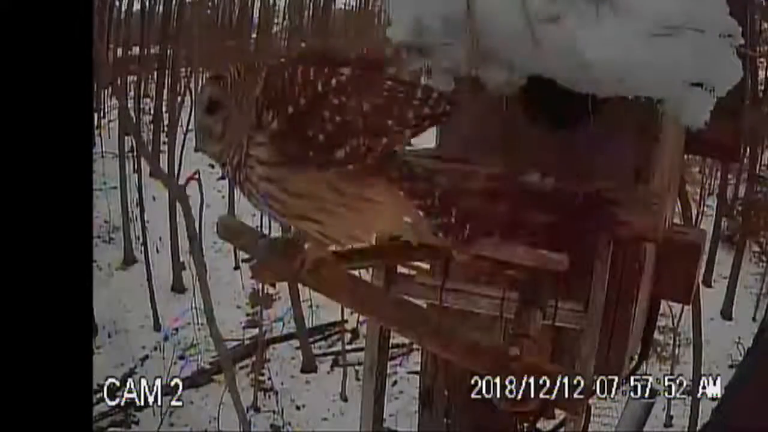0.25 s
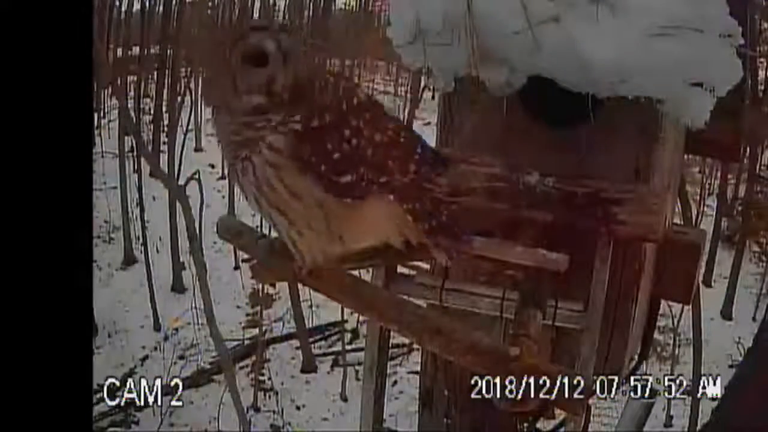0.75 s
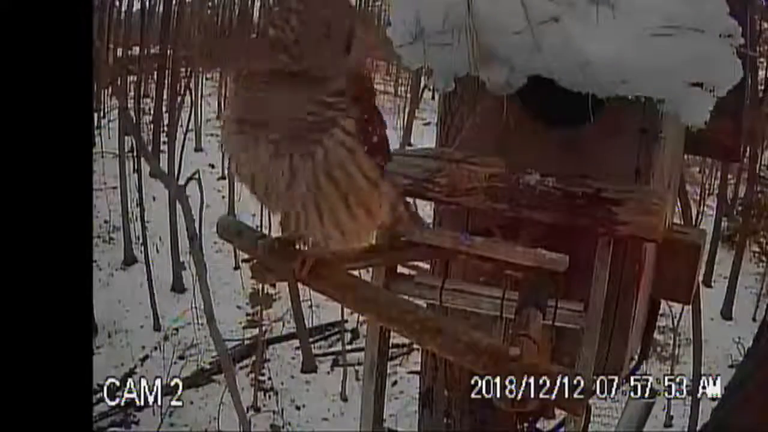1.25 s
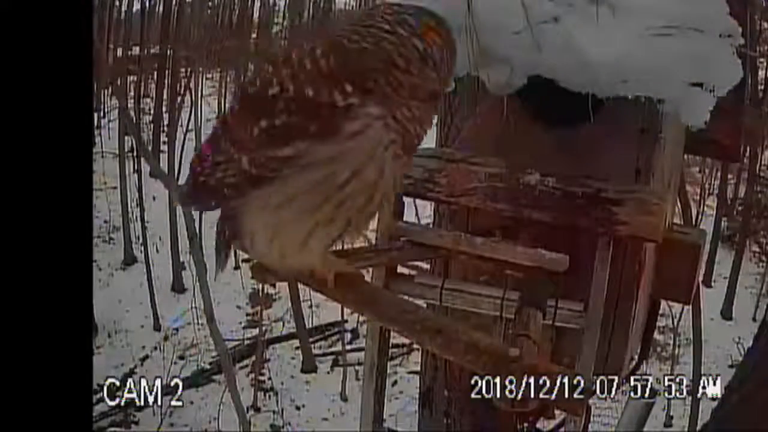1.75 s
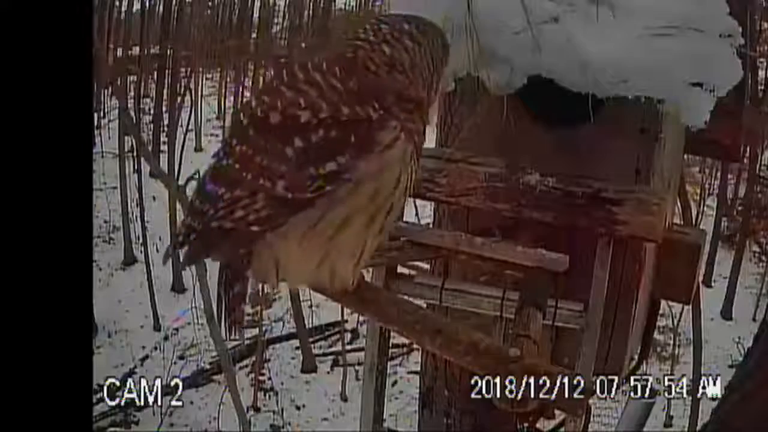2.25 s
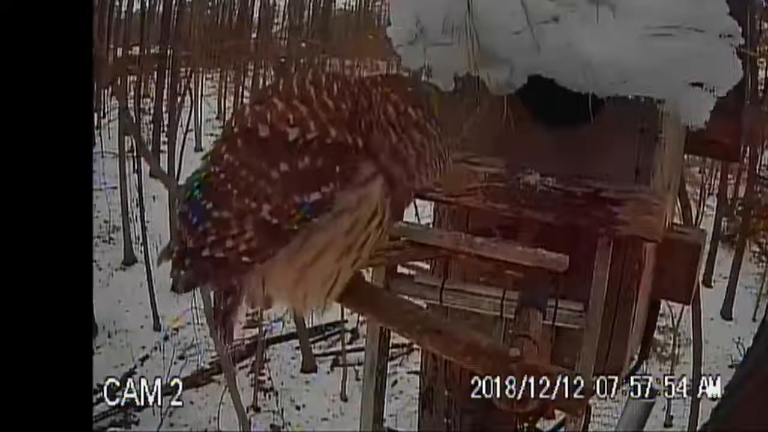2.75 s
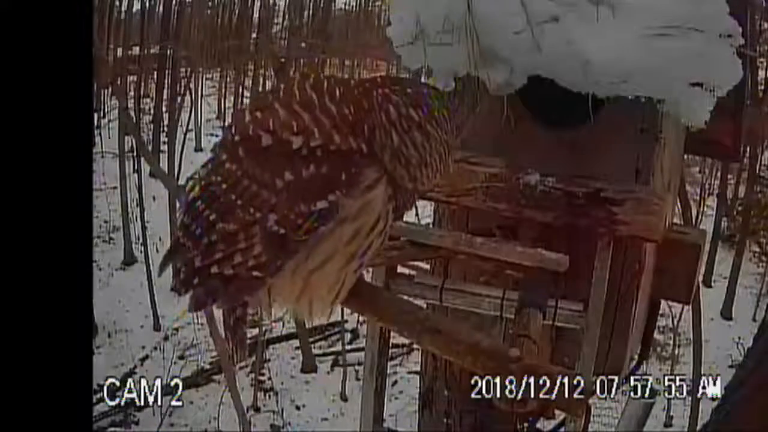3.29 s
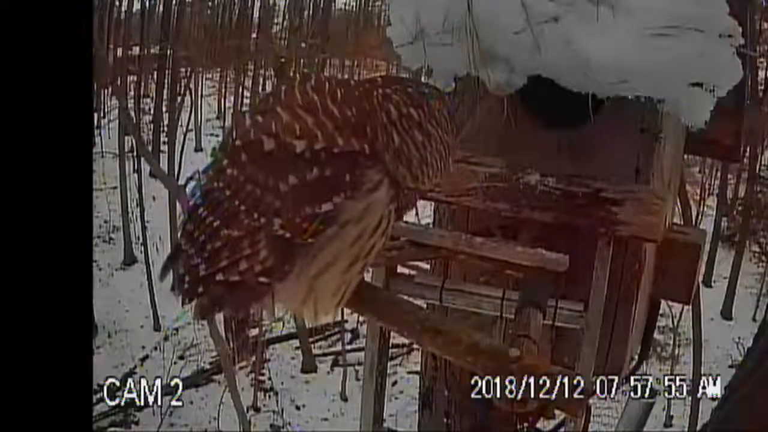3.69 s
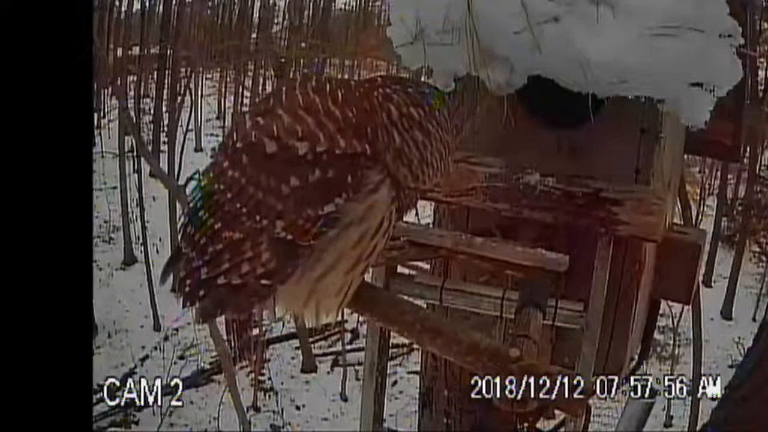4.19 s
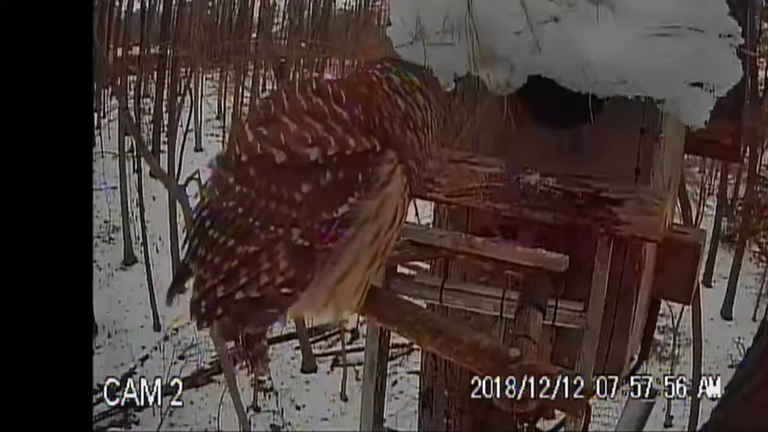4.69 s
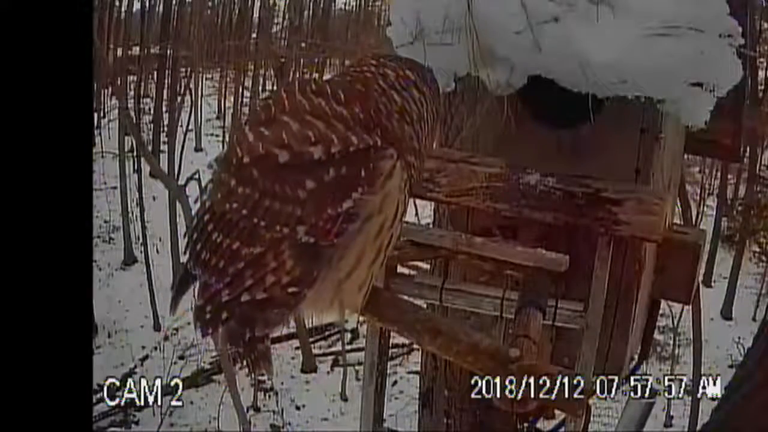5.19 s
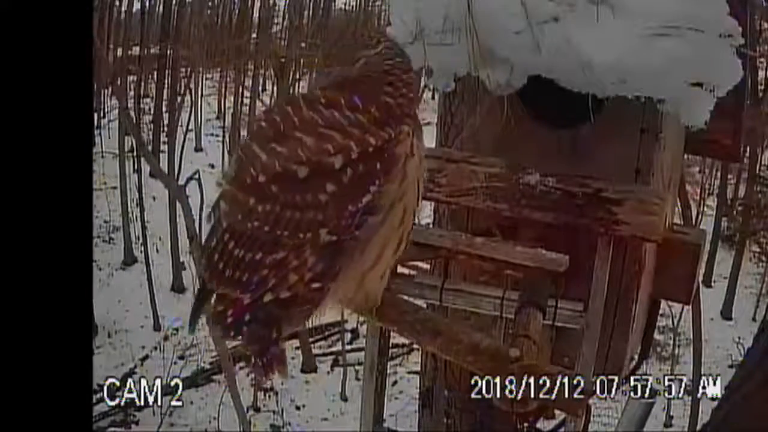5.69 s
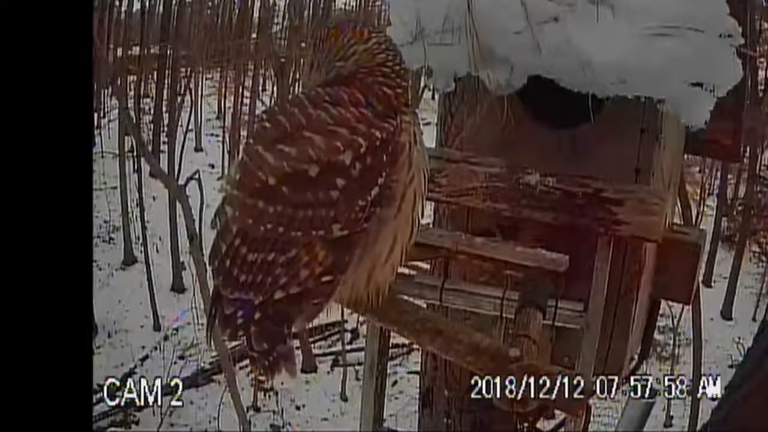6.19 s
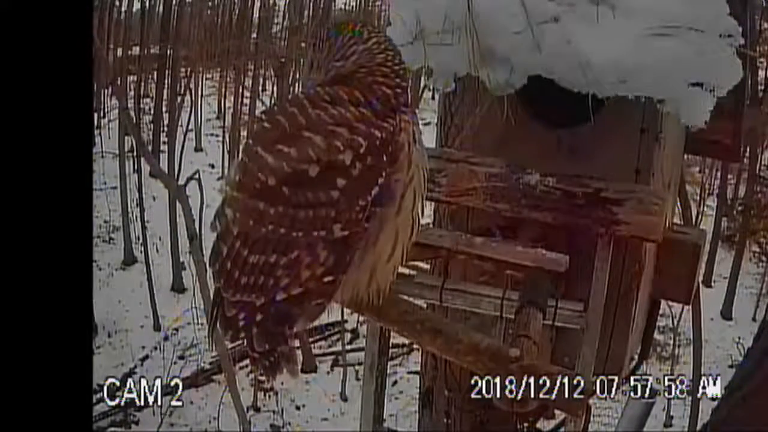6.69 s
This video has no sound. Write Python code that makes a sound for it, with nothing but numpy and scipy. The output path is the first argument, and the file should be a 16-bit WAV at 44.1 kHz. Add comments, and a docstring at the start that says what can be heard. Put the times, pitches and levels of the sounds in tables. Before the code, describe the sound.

Crows caw repeatedly in echoing woods over distant droning traffic, after an owl's claws briefly clatter on a wooden perch.

```python
"""Crows in a winter wood

Crows caw from bare trees: throat resonances shape a hoarse harmonic tone, and a strong echo and the
reverberation of the wood follow each call. An owl's claws excite the modes of a nearby wooden perch.
Far engines drone under it all, in a wash of traffic noise. The narrow-band microphone line feeds the
left channel and leaks faintly into the right."""
import sys
import numpy as np
from scipy import signal
from scipy.fft import rfft, irfft
from scipy.io import wavfile
from scipy.ndimage import uniform_filter1d

SR = 44100
rng = np.random.default_rng(int(sys.argv[2]) if len(sys.argv) > 2 else 0)


def master(y):
    """Save y as 16-bit WAV."""
    cut = np.clip(np.atleast_2d(y).T, -1, 1)
    pcm = np.round(cut * 32767)  # scale
    wavfile.write(sys.argv[1], SR, pcm.astype(np.int16))


N = 306054

# Spectrum of far traffic and the wood's steady sound: f/Hz, relative density/dB
AMBIENT_SPECTRUM = [(15, -56.5), (25, -23), (108, -4), (193, -6.5), (248, -4.5), (346, -13.5), (703, -12.5),
                    (1140, -18), (1550, -10.5), (1720, -22.5), (2360, -31.5), (2560, -35.5), (3150, -36),
                    (3650, -39.5), (4740, -80), (8030, -120)]


def caw(level_db, top_hz, length):
    """Source and filter: a rough harmonic tone on an arched pitch passes the throat's resonances."""
    # Throat response: f/Hz, gain/dB
    formants = [(400, -28), (800, -18), (1050, -19.5), (1300, 0.8), (1620, -1), (1850, -4.5), (2100, -18),
                (2400, -20.5), (2800, -34), (3200, -28.5), (3700, -36.5), (5000, -76)]
    # Arch of a call: end of rise, start of sag (shares of the length);
    # pitch lost at start, at end (shares); effort at start/dB, at end/dB
    short_arch = (.4, .5, .4, .22, -10, -8)
    drawn_arch = (.3, .35, .14, .22, -8, -3)
    # Relative depth of rasp on harmonics 1 to 5; the second is the cleanest
    rasp_depth = [2.5, .3, 2.2, 6, 12]
    risen, sags, start_loss, end_loss, start_db, end_db = short_arch if length < .16 else drawn_arch
    roughness = .2 if length < .16 else .5
    count = round(length * SR)
    share = np.linspace(0, 1, count)
    rise = np.cos(np.pi / 2 * np.minimum(share / risen, 1)) ** 2
    fall = (np.maximum(share - sags, 0) / (1 - sags)) ** 2
    jitter = 1 + .04 * roughness * drift(count, 60)
    turns = np.cumsum(top_hz * (1 - start_loss * rise - end_loss * fall) * jitter) / SR
    rasp = [(.4 + np.exp(-share / .1)) * drift(count, 400) for _ in rasp_depth]  # roughest at the onset
    voice = sum(np.cos(2 * np.pi * (k * turns + rng.random())) * (1 + roughness * depth * rasp[k - 1])
                for k, depth in enumerate(rasp_depth, 1))
    throb_turns = np.cumsum(70 * (1 + .3 * drift(count, 30))) / SR  # the throat throbs near 70 Hz
    voice *= 1 + .12 * np.cos(2 * np.pi * (throb_turns + rng.random()))
    effort = gain_of(start_db * rise + end_db * fall)
    voice = np.pad(effort * voice * signal.windows.tukey(count, .08), 300)
    hz = np.fft.rfftfreq(len(voice), 1 / SR)
    # Nearer, louder caws are brighter, and so are drawn-out ones.
    tilt_db_per_octave = .5954 * (level_db + 28.5) + 5.5 * (length > .16)
    colour_db = spectrum_at(formants, hz) + tilt_db_per_octave * np.log2((hz + 1) / 1500)
    return gain_of(level_db) * irfft(rfft(voice) * gain_of(colour_db), len(voice))[300:]


def crows():
    """Multipath propagation: each caw arrives direct, as clear echoes, and scattered around its tree."""
    # Calls: t/s, level/dB, top pitch f/Hz, length/s, echo gain/dB
    calls = [(0.076, -31, 766, .1, -5.5), (0.164, -28, 810.5, 0.16, -5.5), (0.423, -26.5, 757.6, .12, -6.5),
             (0.55, -26, 825, 0.12, -6), (0.786, -29.5, 719, 0.1, -6), (.885, -27.5, 809, .12, -5.5),
             (1.177, -30.5, 820.7, .11, -2.5), (1.228, -28, 821, .11, -19), (1.311, -37.5, 658, 0.28, -6.5),
             (1.799, -37, 815, 0.1, -2.5), (1.845, -28, 822.5, .11, -5), (2.144, -36, 814.3, 0.12, -5),
             (2.282, -30.5, 811.5, .1, -2.2), (2.4, -37, 626.4, .23, -8), (2.587, -31.5, 803, 0.096, -8.5),
             (2.982, -31.5, 793, 0.13, -5.5), (3.048, -29.5, 804, 0.097, -2.5),
             (3.444, -28.5, 802.5, .11, -3), (3.779, -29, 798.6, 0.11, -6),
             (4.075, -29.5, 804.7, .11, -5.5), (4.39, -31, 796, .1, -3), (4.749, -31, 796.3, .1, -2.8),
             (5.123, -30.5, 797.7, .11, -3.2), (5.489, -31, 790, 0.12, -4.5), (5.991, -31.5, 792, .11, -2),
             (6.259, -30, 796.4, .11, -4), (6.359, -37.5, 631.4, 0.26, -7), (6.424, -32.5, 732, 0.099, -4),
             (6.726, -37.5, 644, 0.23, -15), (6.732, -37.5, 739, .11, -1.1), (6.812, -29.5, 798, .115, -3)]
    # Reflections off a wall and nearby trunks: delay/s, level/dB added to the call's echo gain
    reflections = [(0.043, 4.5), (0.09, -3), (.13, -18)]
    early, trees = np.zeros(N), np.zeros((3, N))
    for start, level_db, top_hz, length, echo_db in calls:
        call = caw(level_db, top_hz, length)
        bird = 0 if length > .16 else 1 if top_hz > 775 else 2  # birds differ in length and pitch
        add(early, start, call)
        add(trees[bird], start, gain_of(echo_db / 2) * call)
        for delay, db in reflections:
            add(early, start + delay, gain_of(echo_db + db) * call)
    return early + gain_of(-3) * sum(wood_reverberation(tree) for tree in trees)


def wood_reverberation(sound):
    """Scattering: trunks return sparse reflections of random sign; each band decays exponentially."""
    # Reverberation time: f/Hz, T60/s
    decay_times = [(700, 0.95), (1500, 0.67), (2500, 0.67), (3500, 0.2)]
    taps = np.zeros(SR)
    slots = np.arange(500, SR - 20, 20)
    taps[slots + rng.integers(0, 20, len(slots))] = rng.choice([-1., 1.], len(slots))
    hz, t, bands = signal.stft(taps, SR, nperseg=256)
    decay = gain_of(-60 * t / spectrum_at(decay_times, hz)[:, None])
    tail = signal.istft(bands * decay, SR, nperseg=256)[1]
    return signal.fftconvolve(sound, tail / np.linalg.norm(tail))[:N]


def owl_claws():
    """Modal excitation: a tap and a dying stick-slip scrape ring the perch modes near the blow's centre."""
    # Blows: t/s, peak level/dB, spectral centre f/Hz, scrape time/s
    blows = [(0.131, -26, 660, 0.015), (0.155, -25, 900, 0.012), (0.2, -22.5, 830, 0.02),
             (0.283, -26, 2700, 0.0025), (0.286, -24, 830, 0.0035), (0.324, -28.5, 2980, 0.025),
             (0.425, -15, 1610, 0.016), (0.447, -26.5, 2290, 0.025), (0.482, -28, 2940, 0.021),
             (1.792, -44, 2800, 0.011), (2.704, -30, 1199, .004)]
    # Modes of the perch: f/Hz, relative level/dB, T60/s
    modes = [(474, -11.5, .03), (754, -8, 0.077), (1194, -5.5, 0.059), (2003, -2.5, 0.04),
             (2134, 3, 0.0083), (2650, -6.5, 0.014), (3130, -14.5, 0.019)]
    out, t = np.zeros(N), np.arange(3000) / SR
    contact = 1 - np.exp(-t / .0004)  # the claw's softness rounds the attack
    for start, peak_db, centre_hz, scrape_s in blows:
        slips = rng.standard_normal(2000) * (rng.random(2000) < .03) * np.exp(-(t[:2000] / scrape_s) ** 2)
        slips[0] = 2.5  # the first tap
        ring = sum(gain_of(db - 60 * t / t60 - 9 * np.log2(hz / centre_hz) ** 2)
                   * np.sin(2 * np.pi * hz * t) for hz, db, t60 in modes)
        turns = t * centre_hz
        crack = 2.5 * turns ** 2 * np.exp(-turns / .7) * np.sin(2 * np.pi * turns)
        blow = signal.fftconvolve(slips, (ring + crack) * contact)
        add(out, start, gain_of(peak_db) * blow / abs(blow).max())
    return out


def far_engines():
    """Atmospheric fading: engine notes swell, glide and waver as the air changes, over a low hum."""
    # Notes: start t/s, crest t/s, end t/s, first f/Hz, last f/Hz, crest level/dB
    notes = [(0, .15, 0.88, 120, 116.8, -46), (.95, 1.4, 1.6, 118, 119.2, -39.5),
             (1.6, 2.45, 3.3, 118, 119.5, -38.5), (3.8, 4.202, 4.8, 120, 119.3, -40.5),
             (4.9, 5.398, 5.86, 115, 112.7, -42.5), (6.45, 6.6, 6.9, 124, 124, -48.5),
             (.1, 1.0, 1.6, 190, 195.5, -47.5), (1.5, 2.1, 3.1, 193, 192.8, -39.5),
             (2.8, 3.5, 5, 195, 193.6, -49.5), (4.7, 5.199, 5.9, 188, 184.2, -43),
             (5.7, 6.3, 6.55, 184.3, 181, -42.5), (6.5, 6.749, 6.8, 180, 177.6, -46.5),
             (0, 0.094, 1.2, 241, 236.3, -45.5), (1.399, 2.2, 2.6, 234.8, 235.3, -47),
             (2.4, 2.9, 3.13, 224, 225.8, -48), (3.149, 4.1, 4.44, 240, 237, -44.5),
             (4.581, 4.745, 5.14, 237, 229.2, -46.5), (5.598, 5.9, 6.94, 251.5, 250, -55.5),
             (0.498, 1.201, 1.5, 287, 285, -48), (1.599, 2.0, 2.7, 282.2, 284.2, -48.5),
             (3.25, 4.0, 4.43, 286, 284.9, -46.5)]
    out, hum_hz, hum_db = np.zeros(N), 60.4, -54
    for start, crest, end, first_hz, last_hz, db in notes:
        t = np.arange(start, end, 1 / SR)
        turns = np.cumsum(np.linspace(first_hz, last_hz, len(t)) + .75 * drift(len(t), 4)) / SR
        swell_db = np.interp(t, [start, crest, end], [-7, 0, -7])
        envelope = signal.windows.tukey(len(t), .1) * gain_of(db + swell_db + 2.04 * drift(len(t), 8))
        add(out, start, envelope * np.sqrt(2) * np.cos(2 * np.pi * turns))
    hum_turns = np.cumsum(hum_hz + 1.5 * drift(N, 4)) / SR
    return out + gain_of(hum_db + 2.5 * drift(N, 3.7)) * np.sqrt(2) * np.cos(2 * np.pi * hum_turns)


def ambience():
    """Incoherent addition: far traffic and the wood merge into noise of slowly changing level."""
    # Envelope: t/s, rms level/dB
    levels = [(0.0, -36.5), (1.02, -39.5), (2.65, -40.5), (2.88, -41.5), (3.88, -40.5), (5.99, -42),
              (6.45, -40.5), (6.94, -42)]
    level_db = np.interp(np.arange(N) / SR, *np.transpose(levels))
    return gain_of(level_db) * noise(AMBIENT_SPECTRUM, patchy_db=2.1)


def gain_of(db):
    """Amplitude ratio of a level in decibels."""
    return 10 ** (np.asarray(db) / 20)


def unit_rms(x):
    """Normalisation to rms 1."""
    return x / np.sqrt(np.mean(x ** 2) + 1e-20)


def spectrum_at(points, hz):
    """Interpolation on a logarithmic frequency axis."""
    f, value = np.transpose(points)
    return np.interp(np.log(hz + 1), np.log(f + 1), value)


def add(mix, start_s, sound):
    """Superposition of a sound on the mix from start_s on."""
    part = mix[round(start_s * SR):][:len(sound)]
    part += sound[:len(part)]


def drift(count, cutoff_hz):
    """Random modulation: low-passed noise of rms 1."""
    return unit_rms(signal.lfilter(*signal.butter(2, cutoff_hz, fs=SR), rng.standard_normal(count)))


def noise(spectrum, patchy_db):
    """Spectral shaping: noise of rms 1 whose level varies in patches of time and frequency."""
    frames, hz = N // 256 + 5, np.fft.rfftfreq(1024, 1 / SR)
    real, imag, patches = rng.standard_normal((frames, 513, 3)).T
    patches = unit_rms(uniform_filter1d(uniform_filter1d(patches, size=12, axis=0), size=14, axis=1))
    bands = (real + 1j * imag) * gain_of(spectrum_at(spectrum, hz)[:, None] + patchy_db * patches)
    return unit_rms(signal.istft(bands, nperseg=1024, noverlap=768)[1][:N])


def scene():
    """Superposition: all sources meet at one microphone on the left; the right input has none."""
    pressure = crows() + owl_claws() + far_engines() + ambience()
    return np.array([pressure, np.zeros(N)])


def record(dry):
    """Capacitive crosstalk: the narrow-band line leaks into the idle input; both hiss and whine."""
    # Hiss of the left and of the idle right input: f/Hz, relative density/dB
    line_hiss = [(2500, -15), (3800, -2.5), (4500, -3.5), (6000, -7.5), (10000, -12), (13000, -17),
                 (15600, -17)]
    idle_hiss = [(30, 7), (4000, -2), (7000, -5), (8000, 11.5), (9000, -13.5), (10000, -7.5), (15600, -4.5)]
    # Whines of the electronics: f/Hz, left level/dB, right level/dB
    whines = [(8000, -98, -90), (15735, -91, -106)]
    line = signal.sosfilt(signal.butter(6, 3900, fs=SR, output="sos"), dry[0])
    power_db = 10 * np.log10(abs(uniform_filter1d(line ** 2, size=900)) + 1e-9)
    hiss_db = -71.5 + .25 * (power_db + 33)  # the hiss rides on the signal
    left = line + gain_of(hiss_db) * noise(line_hiss, patchy_db=1.2)
    hz, t = np.fft.rfftfreq(N, 1 / SR), np.arange(N) / SR
    # The leak is inverted, high-passed at 90 Hz and 70 microseconds early.
    leak = -gain_of(-33.2) * hz / (hz - 90j) * np.exp(2j * np.pi * hz * 7e-5)
    stray_rumble = gain_of(-78.5) * noise(AMBIENT_SPECTRUM, patchy_db=1.1)
    right = irfft(rfft(line) * leak, N) + stray_rumble + gain_of(-86.5) * noise(idle_hiss, patchy_db=0)
    out = np.array([left, right])
    for whine_hz, *levels_db in whines:
        flicker_db = 4 * np.array([drift(N, 15), drift(N, 8.3)])
        out += gain_of(np.array(levels_db)[:, None] + flicker_db) * np.sin(2 * np.pi * whine_hz * t)
    band_limit = signal.firwin(1023, cutoff=15780, window=("kaiser", 9), fs=SR)
    padded = np.pad(out, [(0, 0), (511, 511)], "reflect")
    return signal.oaconvolve(padded, band_limit[None], "valid")


dry = scene()
out = record(dry)
master(out)
```